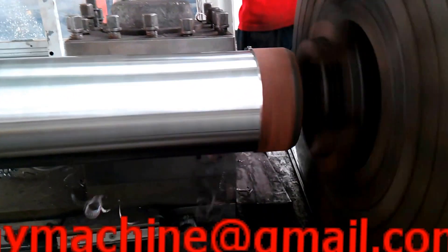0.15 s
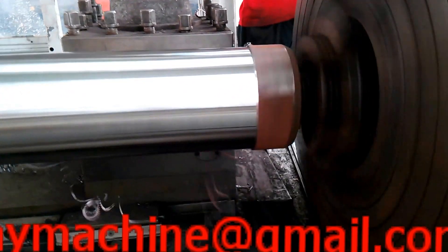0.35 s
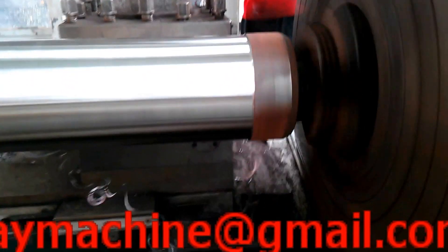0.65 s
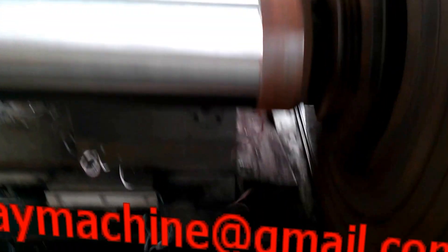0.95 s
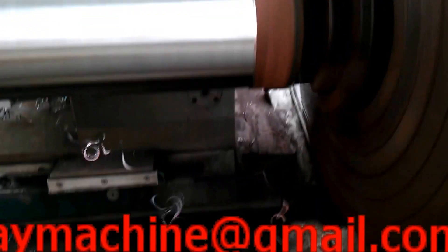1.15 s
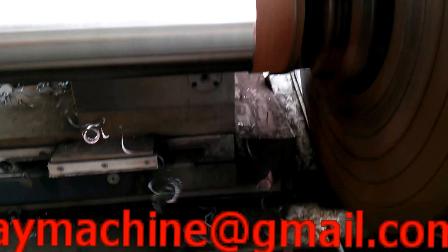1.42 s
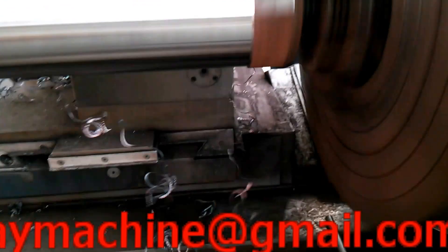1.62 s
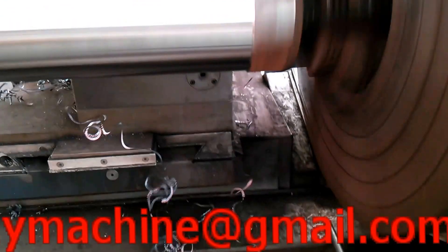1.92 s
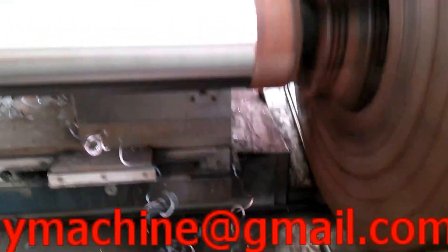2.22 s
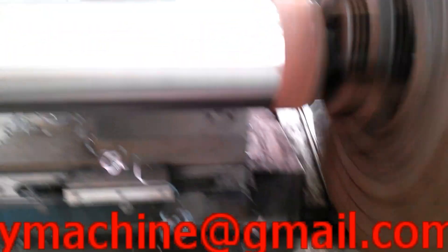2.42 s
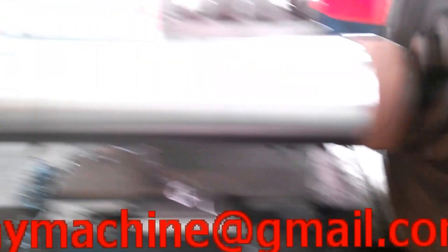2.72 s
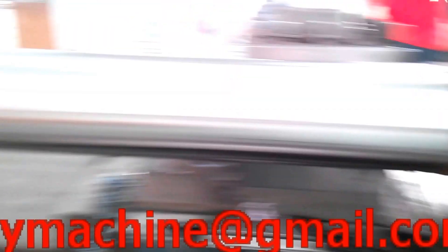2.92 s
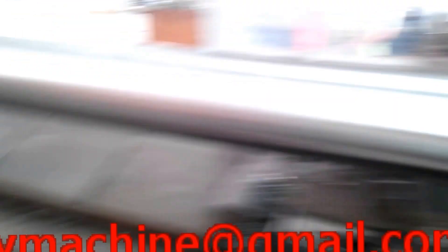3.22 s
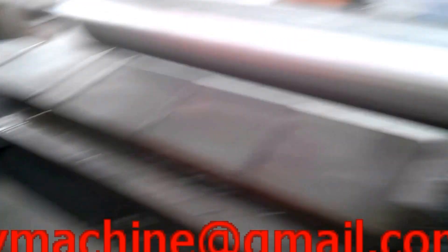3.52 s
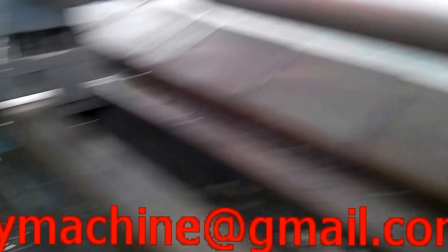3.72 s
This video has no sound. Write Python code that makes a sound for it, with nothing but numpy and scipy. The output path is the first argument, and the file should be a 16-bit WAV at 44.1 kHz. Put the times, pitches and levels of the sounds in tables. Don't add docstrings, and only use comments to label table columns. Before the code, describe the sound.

A big lathe cuts a turning steel roll in a workshop, its very high metallic hiss dipping about three times a second over humming gear roar, heard close on a hand-held stereo camera.

```python
import sys
import numpy as np
from scipy import signal
from scipy.fft import rfft, irfft, next_fast_len
from scipy.io import wavfile
from scipy.ndimage import uniform_filter1d, map_coordinates

SR = 44100
rng = np.random.default_rng(int(sys.argv[2]) if len(sys.argv) > 2 else 0)


def output_pcm(signal):
    pcm = np.clip(np.atleast_2d(signal).T, -1, 1) * 32767
    wavfile.write(sys.argv[1], SR, np.round(pcm).astype(np.int16))


def to_linear_factor(level_db):
    exponent = np.asarray(level_db, float) / 20
    return 10 ** exponent


N = 170226

# (start/s, length/s, lowest chip pitch/Hz, chip level/dB, post rasp/dB)
TURNS = [(-.04, 0.21, 9500, -37, -72), (0.257, 0.24, 8450, -37, -46), (0.648, 0.25, 8480, -34.5, -44.5),
         (0.948, 0.3, 8770, -34.5, -40.5), (1.284, 0.29, 8700, -35, -43), (1.602, 0.29, 8670, -36, -43.5),
         (1.969, 0.23, 9280, -30, -66), (2.271, 0.27, 8400, -38, -47.5), (2.616, 0.258, 8600, -33.5, -62),
         (2.984, 0.23, 8600, -36, -44.5), (3.268, 0.24, 8700, -33.5, -38.5), (3.622, 0.22, 9500, -35, -57)]
# (t/s, cut left-right/dB, drive left-right/dB, main whistle/dB)
LEAN = [(0.0, 11.5, 14, -42), (0.12, 15, 2.5, -40), (0.17, 16, 18, -35), (0.32, 10.5, 6, -53),
        (0.78, 12, 8, -49), (0.91, 6.5, 16, -37), (1.01, 7.5, 13, -49.5), (2.47, 8, 6, -48),
        (2.69, 10.0, -8, -36), (2.96, 13.5, -4, -59), (3.58, 6.5, 10, -71), (3.86, 12, 10.5, -53)]

TIME = np.arange(N) / SR
FRAME = 256
HOP = FRAME // 4
HZ = np.fft.rfftfreq(FRAME, 1 / SR)[:, None]
STEPS = np.arange(4 * N // FRAME + 6) * FRAME / 4 / SR


def unit(x):
    return x / np.sqrt(np.mean(x ** 2) + 1e-20)


def along(points, hz):
    f, v = np.transpose(points)
    return np.interp(np.log(hz + 1), np.log(f + 1), v)


def curves(rows):
    s, *cols = np.transpose(rows)
    return [np.interp(TIME, s, c) for c in cols]


def wobble(rate):
    knots = rng.standard_normal(int(N * rate / SR) + 4)
    return map_coordinates(knots, [np.arange(N) * rate / SR])


def leaning(db):
    return to_linear_factor(np.array([db / 2, -db / 2]))


def cut_lean():
    lean_db = curves(LEAN)[0]
    return leaning(lean_db - lean_db.mean())


def peaks(modes):
    return lambda hz: np.sqrt(sum((to_linear_factor(db) / (1 + (2 * (hz - c) / w) ** 2)) ** 2 for c, w, db in modes))


def spectrum(points):
    return lambda hz: to_linear_factor(along(points, hz))


def noise(gain, left_db, patchy_db, field=1, near=False):
    # (f/Hz, left-right likeness)
    alike = [(60, 0.98), (240, 0.95), (950, 0.47), (3770, -0.1), (15000, 0.41)]
    cut_alike, cut_turn = 0.55, 2.2
    white = rng.standard_normal((2, (len(STEPS) - 1) * HOP))
    z = signal.stft(white, nperseg=FRAME, noverlap=FRAME - HOP)[2]
    patches = uniform_filter1d(rng.standard_normal(z.shape[1:]), size=3, axis=0)
    patches = uniform_filter1d(patches, size=30, axis=1)
    z = z * to_linear_factor(patchy_db * unit(patches)) * field
    pair = signal.istft(z, nperseg=FRAME, noverlap=FRAME - HOP)[1]

    m = next_fast_len(N + 8192)
    hz = np.fft.rfftfreq(m, 1 / SR)
    turn = np.arccos(np.clip(cut_alike if near else along(alike, hz), -1, 1)) / 2
    a, b = rfft(pair, m) * gain(hz)
    mid, side = a * np.cos(turn), b * np.sin(turn)
    right = (mid - side) * np.exp(1j * cut_turn * near)
    ports = irfft(np.array([mid + side, right]), m)[:, :N]
    if not np.ndim(field):
        ports = unit(ports)
    return ports * to_linear_factor([[left_db / 2], [-left_db / 2]])


def depth(t, start, length):
    fall_s, rise_s = 0.075, 0.065
    ramp = np.minimum((t - start) / fall_s, (start + length - t) / rise_s)
    return np.sin(np.pi / 2 * np.clip(ramp, 0, 1))


def chip():
    # (start/s, length/s, pitch/Hz, level/dB)
    curls = [
        (0.085, 0.14, 8450, -37),
        (0.198, 0.36, 10700, -32),
        (2.135, 0.39, 10780, -27),
        (2.65, .2, 10600, -40),
        (3.128, 0.18, 10940, -28.5),
    ]
    # (f/Hz, width/Hz, level/dB)
    roll = [(8450, 350, -5), (8780, 420, -2.5), (9500, 240, -4.5), (9950, 250, 3), (10365, 390, -3.5),
            (11050, 380, -4.5), (12420, 250, -8)]
    rest_hz, width_hz, slide_db = 11600, 360, -8
    fill_db, below_db = -11, -23
    drift_hz = 90 * np.interp(STEPS, TIME, wobble(24.97))
    power = 0
    for start, length, low_hz, db, *_ in [*TURNS, *curls]:
        d = depth(STEPS, start, length)
        centre = rest_hz + (low_hz - rest_hz + drift_hz) * d
        ring = 1 / (1 + (2 * (HZ - centre) / width_hz) ** 2) ** 2
        above = (HZ > centre) * (HZ < rest_hz) * to_linear_factor(fill_db) ** 2
        below = (HZ > 5400) * (HZ < centre) * to_linear_factor(below_db) ** 2
        level = np.minimum(4 * d, 1) * to_linear_factor(db + slide_db * (1 - d ** 3)) ** 2
        power = power + (ring + above + below) * level
    field = np.sqrt(power * SR / (np.pi * width_hz / 2))
    between_db = -6
    response = lambda hz: to_linear_factor(2.0) * np.hypot(peaks(roll)(hz), to_linear_factor(between_db))
    friction = noise(response, left_db=8, patchy_db=2.3, field=field, near=True)
    return to_linear_factor(0.9 * wobble(60)) * friction * cut_lean()


def tool():
    # (t/s, cutting pressure/dB)
    pressure = [(0.0, -38), (0.09, -54), (0.2, -33), (1.83, -32), (1.97, -49), (1.99, -39), (2.11, -51),
                (2.21, -39), (2.54, -30.5), (2.6, -35.5), (3.02, -32), (3.19, -32.5), (3.2, -34.5),
                (3.53, -37), (3.6, -55), (3.64, -45), (3.79, -46.5), (3.86, -37)]
    # (f/Hz, width/Hz, level/dB)
    modes = [(11850, 70, 4), (11800, 320, 0), (11450, 340, -1.5), (12150, 260, -8)]
    # (f/Hz, level/dB)
    swarf = [(4000, -25), (7500, -10), (8800, -5), (10500, -1), (11700, 0), (12250, -9), (12900, -30)]
    pressure_db, = curves(pressure)
    sing = noise(peaks(modes), left_db=12.5, patchy_db=-1.0, near=True)
    sing = sing * to_linear_factor(0.32 * wobble(70) + 1.76 * wobble(16))
    scrape = noise(spectrum(swarf), left_db=8.5, patchy_db=7.5, near=True)
    scrape = scrape * to_linear_factor(-3 + 1.5 * wobble(90))
    return to_linear_factor(pressure_db) * (sing + scrape) * cut_lean()


def tool_post():
    # (f/Hz, width/Hz, level/dB)
    post = [(2542, 250, -1), (2781, 170, 0.5), (5570, 500, -5), (6440, 500, -7)]
    lag_s, idle_db = 0.031, -46.5
    push = to_linear_factor(idle_db)
    for start, length, _, _, db in TURNS:
        push = push + to_linear_factor(db) * depth(TIME, start + lag_s, length)
    flutter = to_linear_factor(1.1 * wobble(14) + 1.4 * wobble(60))
    return push * flutter * noise(peaks(post), left_db=1.5, patchy_db=2.2)


def headstock():
    # (t/s, overall level/dB, main mesh level/dB, low shafts/dB, shop hiss at the ports/dB)
    machine = [(0.0, -35, -17, -25, -2), (0.12, -33.5, -6, -5, 1), (0.27, -41, -13.5, -7.5, -0.5),
               (0.69, -36.5, -10, -12.5, -2.5), (0.83, -36, 0, -10.5, -1), (1.55, -36.5, -2.5, -11, -0.5),
               (2.2, -34, 0.5, -8, -1.5), (2.24, -40, 0, -8, 0.5), (2.71, -35.5, -3, -13.5, -2),
               (2.76, -41, -12, -1, 5.5), (2.85, -36.5, 1, -3, 3), (2.97, -47.5, -10, 1.5, -2.5),
               (3.03, -41, 5.5, -8, 0.5), (3.15, -35.5, -22, -1, 1), (3.27, -41.5, 3, -6.5, 4.5),
               (3.47, -36, -10, -1.5, -1), (3.82, -34.5, -16, -11, -3), (3.86, -35, 4.5, -13, 0.5)]
    # (f/Hz, level/dB per Hz)
    casing = [(20, -20), (30, -22), (80, -19.5), (180, -18.5), (250, -9), (700, -5.5), (1260, -17.5),
              (2300, -27.5)]
    # (f/Hz, width/Hz, level/dB)
    gear_modes = [(510, 12, -5), (614, 12, -3), (839, 13, 0), (879, 12, -5), (1090, 15, -12),
                  (1390, 20, -17), (1680, 20, -17)]
    # (f/Hz, width/Hz, level/dB)
    shaft_modes = [(233, 10, -4), (274, 11, 0), (344, 9, 0)]
    # (f/Hz, width/Hz, level/dB)
    mesh_modes = [(667, 28, 0), (690, 110, -11)]
    # (f/Hz, level/dB per Hz)
    hiss = [(1100, -27), (2300, -5), (3400, -5), (4300, -4.5), (9000, -6.5), (12500, -2.5), (13800, -9.5),
            (15300, -6.5)]
    loud_db, mesh_db, shafts_db, hiss_db = curves(machine)
    surge_db = 0.7 * wobble(9)

    roar = noise(lambda hz: spectrum(casing)(hz) * (hz < 3000), left_db=-0.5, patchy_db=2.6)
    roar = roar * to_linear_factor(-4 + 0.7 * wobble(15))
    gears = to_linear_factor(-7.5) * noise(peaks(gear_modes), left_db=0.9, patchy_db=4.5)
    shafts = to_linear_factor(shafts_db - 1.5) * noise(peaks(shaft_modes), left_db=-0.5, patchy_db=2.8)
    tone = to_linear_factor(-7 + 1.2 * wobble(14)) * np.sin(2 * np.pi * 667 * TIME + 1.1 * wobble(16))
    mesh = noise(peaks(mesh_modes), left_db=5.5, patchy_db=2.5) + tone * to_linear_factor([[3.5], [-2.5]])
    mesh = to_linear_factor(mesh_db) * mesh

    air = noise(lambda hz: spectrum(hiss)(hz) * (hz > 900), left_db=-3.0, patchy_db=1.73)
    air_db = -35 + hiss_db + 0.58 * (loud_db - loud_db.mean() + surge_db)
    return to_linear_factor(loud_db + surge_db) * (roar + gears + shafts + mesh) + to_linear_factor(air_db) * air


def drive():
    # (f/Hz, rms level/dB)
    lines = [(12618, -55), (13431, -59), (14169, -77), (14336, -63), (14766, -51), (14955, -62),
             (15084, -61), (15283, -57), (15461, -56), (15622, -64)]
    skirt_hz, skirt_db = 90, -10
    _, lean_db, main_db = curves(LEAN)
    strongest = max(db for _, db in lines)
    whistles = np.zeros((2, N))
    for hz, db in lines:
        level_db = main_db if db == strongest else db + 1.5 + 3 * wobble(4)
        for ear in range(2):
            fade = to_linear_factor(level_db + 2 + 2 * wobble(5))
            skirt = 1 + to_linear_factor(skirt_db) * wobble(skirt_hz)
            whistles[ear] += fade * skirt * np.sin(2 * np.pi * hz * TIME + 1.1 * wobble(22))
    hum = to_linear_factor(-64.5 + 1.6 * wobble(7.1)) * np.sin(2 * np.pi * 45 * TIME + 0.61 * wobble(6.3))
    return whistles * leaning(lean_db) + hum


def camera_gate(x):
    # (f/Hz, over the block's usual level/dB)
    mask = [(12300, -25), (12800, -5), (13500, -1), (13900, 1), (14200, 1), (14400, -3), (14520, -40)]
    # (f/Hz, over the neighbourhood/dB)
    step = [(900, -14), (1900, -1), (2700, -3.5), (3400, 2.5), (4000, 0), (5000, -1), (6000, -2.5),
            (8600, -5), (12200, -5), (13000, 0), (14300, 0), (14500, -6)]
    # (start/s, length/s, threshold rise/dB)
    strict = [
        (.22, .35, 8),
        (.7, .18, 1),
        (1.0, .27, 1.5),
        (1.48, .37, 1.5),
        (2.2, .15, 1.5),
        (2.35, .21, 7),
        (2.56, .36, .5),
        (2.92, .07, 8),
        (3.05, .46, 1),
    ]
    easy_db, top_hz = -5, 15720
    hz, t, z = signal.stft(x, SR, "cosine", nperseg=2048)
    power = (abs(z) ** 2).sum(axis=0)
    capped = np.minimum(power, 4 * np.median(power, axis=1)[:, None])

    bands = np.add.reduceat(capped, np.arange(0, len(hz), 16))
    wide = uniform_filter1d(bands, size=2, axis=1)[np.arange(len(hz)) // 16]
    rise_db = easy_db
    for start, length, db in strict:
        rise_db = rise_db + (db - easy_db) * (abs(t - start - length / 2) < length / 2)
    usual = np.median(wide, axis=1)[:, None]
    blocks = wide > usual * spectrum(mask)(hz)[:, None] ** 2 * to_linear_factor(rise_db) ** 2

    around = uniform_filter1d(uniform_filter1d(capped, size=21, axis=0), size=3, axis=1)
    lines = uniform_filter1d(power, size=2, axis=0) > around * spectrum(step)(hz)[:, None] ** 2
    kept = z * blocks * lines * (hz[:, None] < top_hz)
    return signal.istft(kept, SR, "cosine", nperseg=2048)[1][:, :N]


def scene():
    return chip() + tool() + tool_post() + headstock() + drive()


def band_limit(x):
    return signal.sosfilt(signal.butter(12, 16880, fs=SR, output="sos"), x)


def record(dry):
    return band_limit(camera_gate(dry))


dry = scene()
out = record(dry)
output_pcm(out)
```